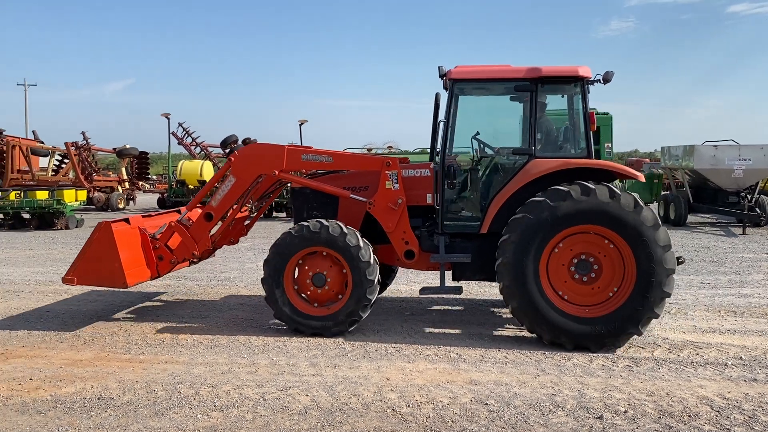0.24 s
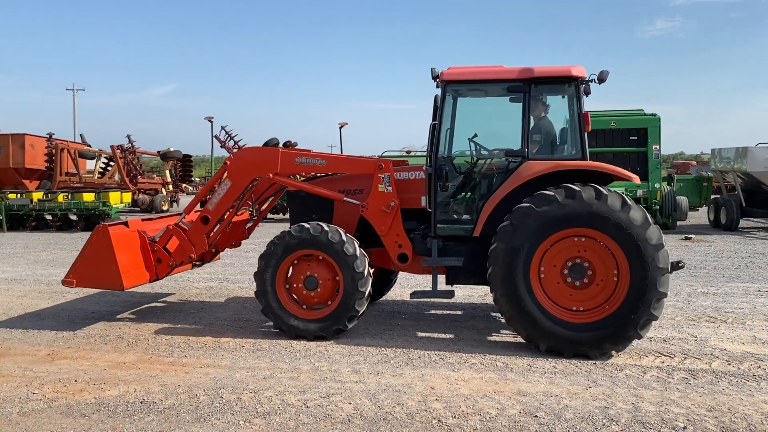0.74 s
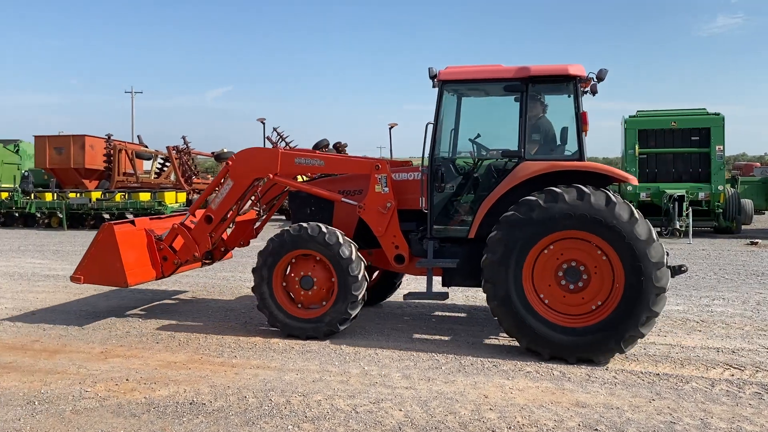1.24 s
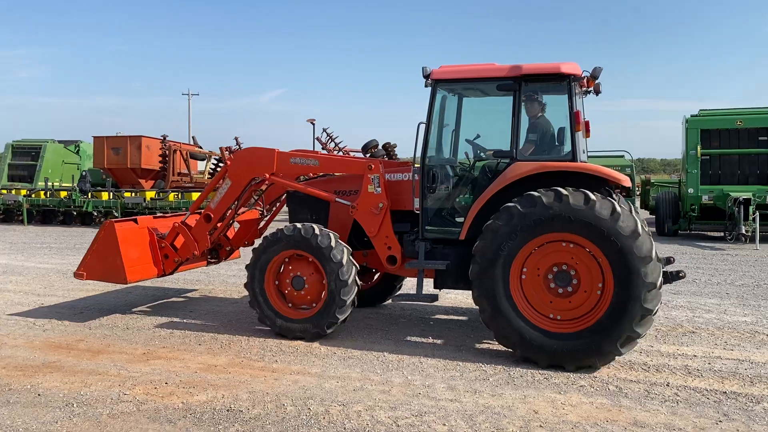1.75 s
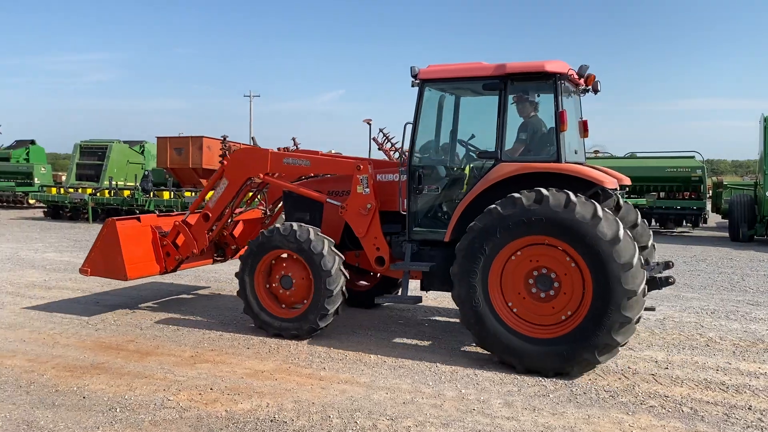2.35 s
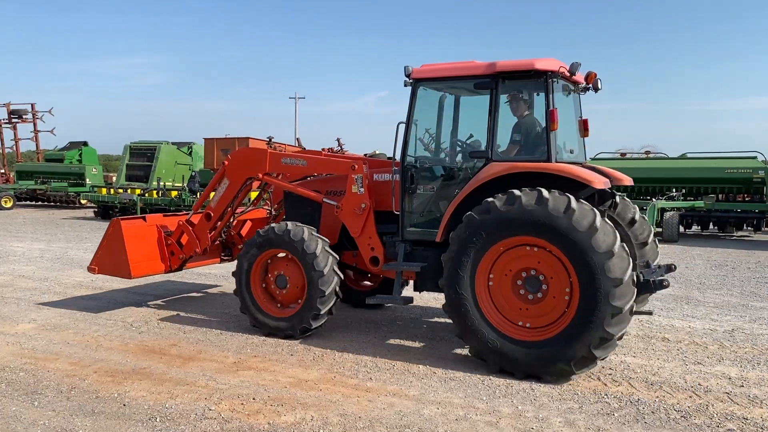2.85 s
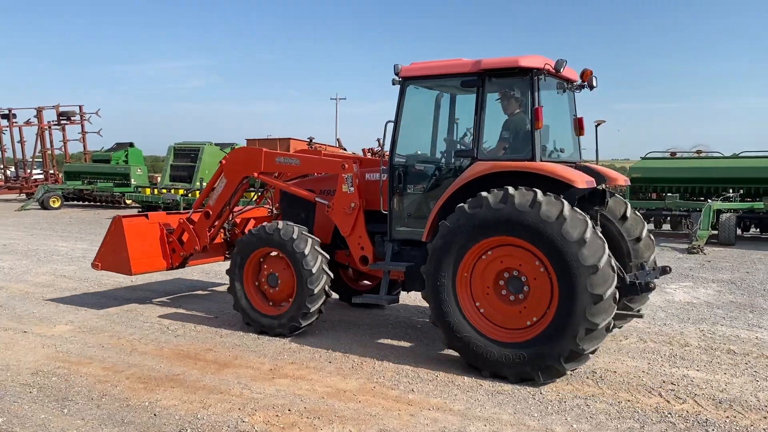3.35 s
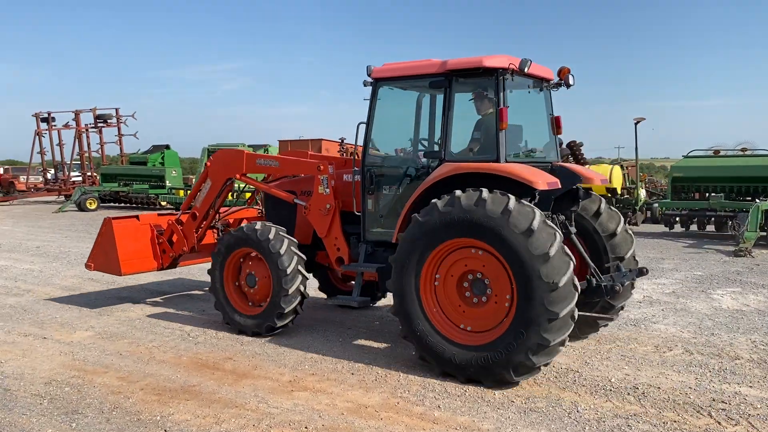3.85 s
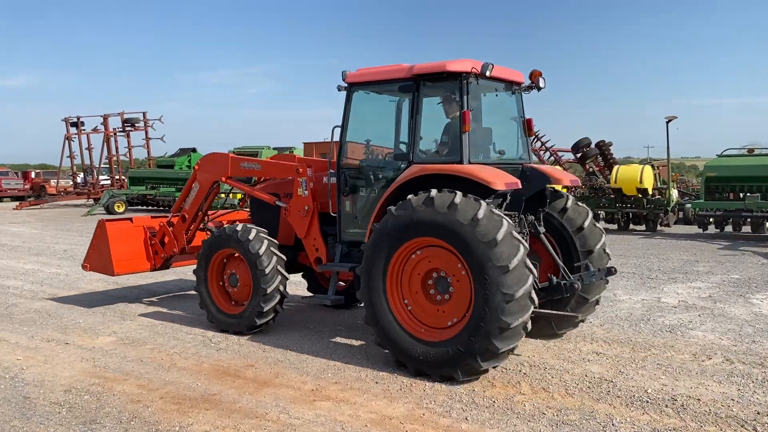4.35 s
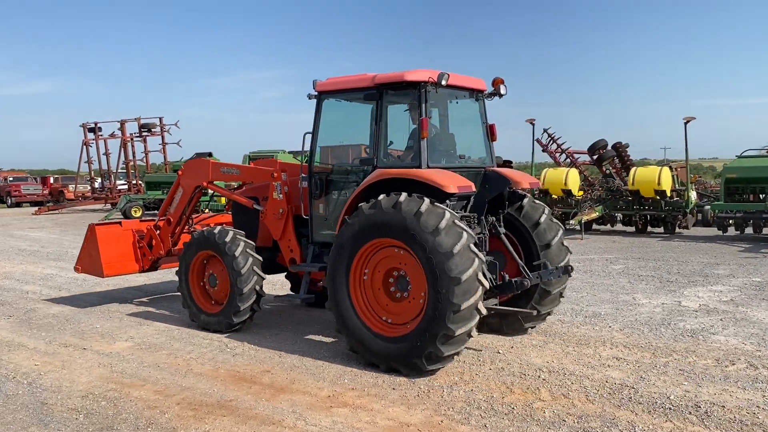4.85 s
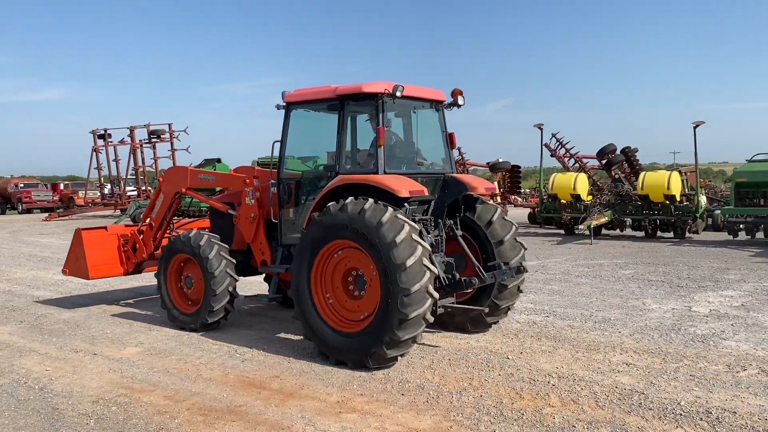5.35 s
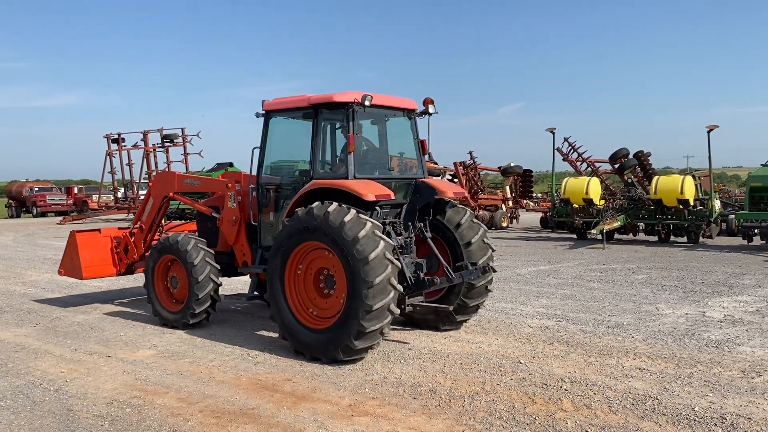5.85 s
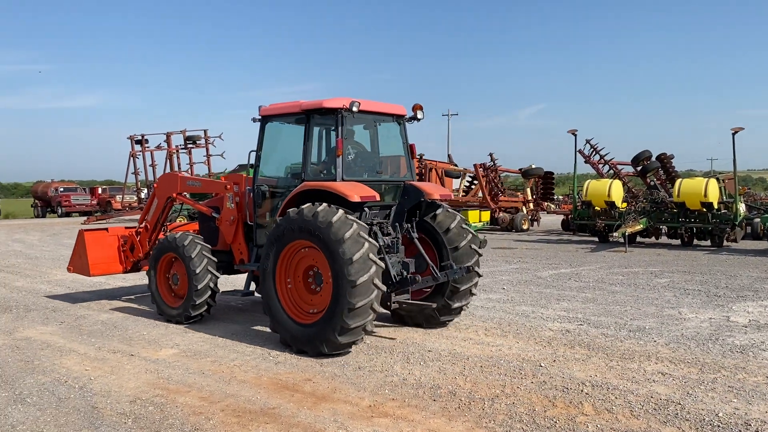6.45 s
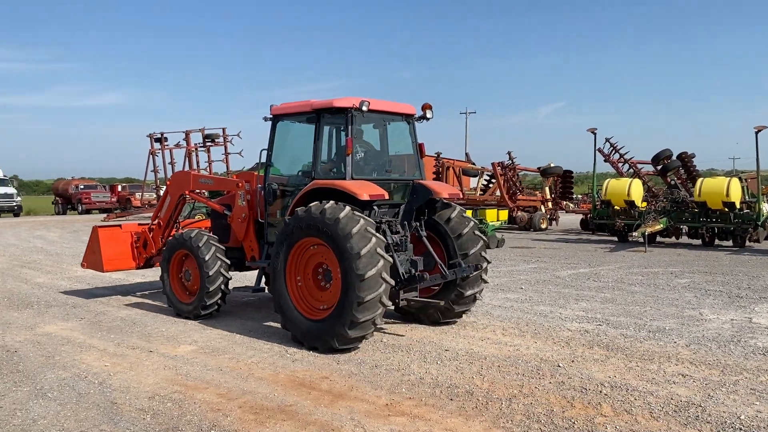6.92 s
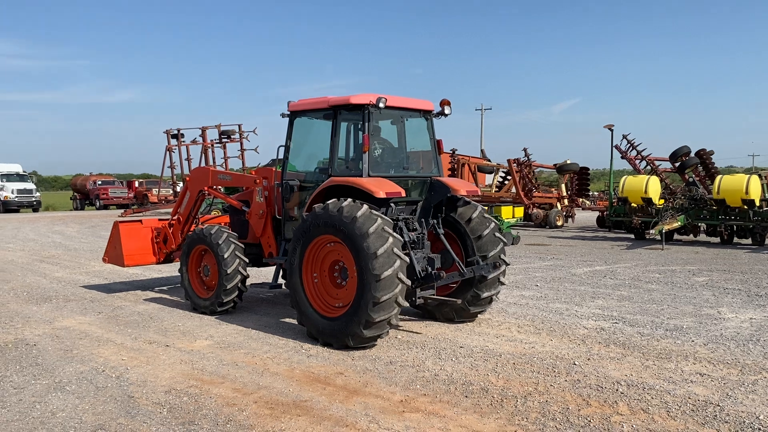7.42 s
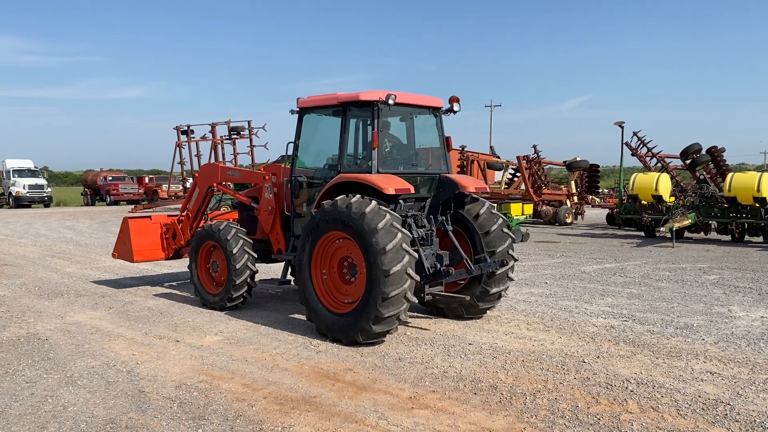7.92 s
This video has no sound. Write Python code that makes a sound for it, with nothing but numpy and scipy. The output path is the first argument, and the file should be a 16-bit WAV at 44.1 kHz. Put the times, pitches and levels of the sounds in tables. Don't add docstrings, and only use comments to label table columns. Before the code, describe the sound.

A diesel tractor creeps over a gravel yard at close to middle distance, its engine knocking and rattling steadily with low boom, hiss and a thin throbbing whine. Single stones snap under the tyres. Around five and a half seconds the revs sink to a slower, duller idle, then gravel crunches briefly. Wind rumbles and thumps on the bare stereo microphone throughout most of it, with strong late bursts.

```python
import sys
import numpy as np
from scipy import signal
from scipy.fft import rfft, irfft, next_fast_len
from scipy.io import wavfile

SR = 44100
rng = np.random.default_rng(int(sys.argv[2]) if len(sys.argv) > 2 else 0)


def gain_from_db(level_db):
    decades = np.asarray(level_db, float) / 20
    return 10 ** decades


def store_wav(level_fs):
    pcm = np.round(np.clip(np.atleast_2d(level_fs), -1, 1) * 32767)
    wavfile.write(sys.argv[1], SR, pcm.T.astype(np.int16))


N = 360738

# (time [s], level [dB], turned away [0-1])
TRACTOR = [(0, -28.5, 0.06), (.5, -28, 0.07), (1, -28, 0.08), (1.5, -28.5, 0.13), (2.4, -25.5, 0.04),
           (2.7, -27.5, 0.15), (3.05, -27.5, 0.03), (3.8, -29, .2), (4.1, -27.5, 0.1), (5.2, -29, 0.2),
           (5.5, -31, 0.68), (5.9, -31.5, 1), (6.15, -33, 0.26), (7, -32, 1), (7.3, -34.5, 0.54),
           (7.6, -34.5, 1), (8.18, -33.5, 1)]
# (time [s], peak [dB])
GRIT_TICKS = [(0.185, -40), (0.5127, -48), (1.1343, -48), (1.27, -37), (1.6452, -47), (1.8836, -46),
              (2.2194, -42), (2.2373, -36), (2.9294, -51), (3.2254, -47), (4.5895, -31), (4.8698, -35),
              (5.6501, -40), (5.7798, -39), (6.6134, -35), (6.8244, -40), (6.992, -43)]


def evened(x):
    return x / np.sqrt(np.mean(x ** 2) + 1e-20)


def read(points, hz):
    f, value = np.transpose(points)
    return np.interp(np.log(hz + 1), np.log(f + 1), value)


def curves(rows):
    s, *columns = np.transpose(rows)
    return [np.interp(np.arange(N) / SR, s, c) for c in columns]


def swells(rows):
    t = np.arange(N) / SR
    return sum(db * np.exp(-((t - s) / half) ** 4) for s, db, half in rows)


def drift(hz):
    return evened(signal.lfilter(*signal.butter(2, hz, fs=SR), rng.standard_normal(N)))


def coloured(x, points):
    size = next_fast_len(N)
    response = gain_from_db(read(points, np.fft.rfftfreq(size, 1 / SR)))
    return irfft(rfft(x, size) * response, size)[..., :N]


def resonate(x, hz, width):
    peak = signal.iirpeak(hz, hz / width, fs=SR)
    return signal.lfilter(*peak, signal.lfilter(*peak, x))


def snap(noise, lo_hz, hi_hz, decay):
    n = np.arange(len(noise))
    blow = (noise + 9 * (n == 0)) * np.exp(-n / SR / decay)
    band = signal.lfilter(*signal.butter(3, [lo_hz, hi_hz], "band", fs=SR), blow)
    return band / abs(band).max()


def at_ports(direct, diffuse):
    # (frequency [Hz], coherence [0-1])
    likeness = [(60, 0.84), (130, 0.88), (290, 0.54), (640, 0.69), (1410, 0.78), (3100, 0.51), (6820, 0.4),
                (15000, 0.17)]
    # (frequency [Hz], left over right [dB])
    balance = [(60, 0.00032), (180, -0.15), (550, 1.0), (1500, .3), (2800, -1.3), (5500, 0.92),
               (15000, -0.12)]
    # (frequency [Hz], left leads by [rad])
    lead = [(60, 0.36), (1500, 0.25), (3000, 0), (4900, 0.83), (5600, 1), (7000, 0)]
    size = next_fast_len(N)
    hz = np.fft.rfftfreq(size, 1 / SR)
    same = np.clip(read(likeness, hz), 0, 1)
    left = rfft(direct, size)
    right = same * left + np.sqrt(1 - same ** 2) * rfft(diffuse, size)
    right = right * np.exp(-1j * read(lead, hz))
    tilt = gain_from_db(read(balance, hz) / 2)
    return irfft(np.array([left * tilt, right / tilt]), size)[:, :N]


def far_hum():
    # (frequency [Hz], width [Hz], level [dB])
    far_line = (1150, 14, -53)
    hz, width, db = far_line
    return gain_from_db(db) * evened(resonate(rng.standard_normal(N), hz, width)) * np.array([[1], [-.6]])


def wind():
    # (time [s], rumble [dB], flutter [dB], unlike share [0-1])
    mean_wind = [(0, -16, -24, 0.35), (.9, -20, -26.5, 0.14), (1.2, -22.5, -26, 0.16),
                 (1.4, -15, -27.5, 0.28), (2.1, -15.5, -20.5, 0.52), (2.9, -14, -24, 0.18),
                 (3.15, -20, -24.5, 0.14), (4.0, -22, -22, 0.1), (4.45, -32.5, -23, 0.02),
                 (4.6, -19, -24, 0.2), (5.25, -19, -20.5, 0.14), (5.85, -22.5, -25.5, 0.29),
                 (6.5, -24, -22.5, .25), (6.9, -19, -18, 0.27), (7.0, -21, -29, 0.6),
                 (7.5, -23.5, -27, 0.48), (7.56, -33.5, -37, 0.4), (8.18, -38, -39, 0.36)]
    # (middle [s], rumble swell [dB], half length [s], flutter swell [dB])
    gusts = [(0.106, 1, 0.066, 5.5), (0.266, -16, 0.029, 1), (0.221, 4.5, 0.032, -19),
             (.55, -13, 0.034, -3), (1.273, 3.5, 0.029, 2.5), (1.496, 5, 0.015, 4), (7.3, -3, 0.079, -0.5),
             (1.672, -18, 0.029, 0), (7.168, 2, 0.015, -6), (2.26, 0, 0.052, 5), (2.38, 9.5, 0.033, 4.5),
             (2.48, -7, 0.068, 0), (2.938, 2.5, 0.028, 7.5), (3.03, 2.5, 0.042, 1.5), (3.74, -4, 0.036, -6),
             (4.784, -7, 0.028, -0.5), (4.927, 1.5, 0.027, 1), (4.964, -3, 0.022, -10),
             (5.062, -3, 0.024, 0.5), (5.185, -9, 0.026, -4), (5.705, -3.5, 0.043, 3),
             (6.283, -9, 0.023, -1.5), (6.35, 2, 0.052, 3.5), (6.71, 1.5, 0.071, 4), (6.88, -7, 0.028, -2),
             (7.103, 6.5, 0.063, 14.5), (7.214, 6, 0.021, 12.5), (7.399, 10.5, 0.033, 11),
             (7.469, -1, 0.029, 11), (7.777, 15, 0.011, -8), (8.17, 0, 0.066, 11)]
    # (frequency [Hz], density [dB per Hz])
    rumble_spectrum = [(20, -49), (35, -4.5), (55, 6.5), (90, 5), (140, -4.5), (220, -18), (400, -71)]
    # (frequency [Hz], density [dB per Hz])
    flutter_spectrum = [(70, -21), (130, 1), (200, 0), (300, -6.5), (450, -8.5), (700, -25.5), (1100, -79)]
    rumble_db, flutter_db, unlike = curves(mean_wind)
    rumble_db = rumble_db + swells([(s, db, half) for s, db, half, _ in gusts])
    flutter_db = flutter_db + swells([(s, db, half) for s, _, half, db in gusts]) - rumble_db
    lumps_db = drift(11.5)
    noise = rng.standard_normal((2, 2, N))
    rumble = evened(coloured(noise[0], rumble_spectrum) * gain_from_db(1.15 * lumps_db))
    flutter_lumps = gain_from_db(1.2 * lumps_db + 1.8 * drift(40))
    flutter = gain_from_db(flutter_db - 2.5) * evened(coloured(noise[1], flutter_spectrum) * flutter_lumps)
    apart = np.clip(unlike, 0, 1) * (0.68 * rumble[1] + 1.44 * flutter[1])
    level = gain_from_db(rumble_db - 0.5 + np.array([[.2], [-.2]]))
    return level * (rumble[0] + flutter[0] + apart * np.array([[1], [-1]]))


def pops():
    # (time [s], peak [dB], length [s])
    soft_pops = [(.07, -6.5, 0.015), (0.108, -16, 0.015), (1.483, -13, 0.023), (1.808, -15, 0.015),
                 (2.367, -11.5, 0.034), (2.393, -11.5, 0.026), (6.719, -6.5, 0.018), (6.962, -15, 0.031),
                 (7.041, -5.5, 0.025), (7.093, -8.5, 0.021), (7.118, -2.5, 0.024), (7.191, -11, 0.015),
                 (7.406, -19, 0.033), (7.447, -17, 0.024)]
    # (time [s], peak [dB], length [s])
    sharp_pops = [
        (5.228, -16, 0.023),
        (6.594, -22, 0.019),
        (6.849, -9, 0.0076),
        (7.07, -10.5, 0.0113),
        (7.125, -9, 0.0188),
        (7.211, -0.5, 0.014),
        (7.384, -16, 0.021),
    ]
    # (time [s], peak [dB], length [s])
    thumps = [
        (0.078, 3.5, 0.013),
        (.134, -1, 0.018),
        (1.494, -10, .02),
        (1.553, -7, 0.013),
        (1.705, -7, 0.014),
        (1.82, -7, 0.022),
        (2.94, -8.5, 0.044),
        (.32, -12, 0.026),
        (7.344, -12, .03),
    ]
    out = np.zeros(N + SR)
    for extra_hz, rows in (226.5, soft_pops), (626, sharp_pops), (70, thumps):
        for s, db, length in rows:
            t = np.arange(round(3 * length * SR)) / SR
            pitch = 75 + extra_hz * np.exp(-t / (0.311 * length))
            swing = np.sin(2 * np.pi * np.cumsum(pitch) / SR)
            envelope = np.exp(-t / length) * np.minimum(t / 0.0019, 1) * np.cos(np.pi / 6 * t / length)
            out[round(s * SR):][:len(t)] += gain_from_db(db) * swing * envelope
    return out[:N]


def stones():
    # (time [s], crack
    # peak [dB], knock above crack [dB])
    cracks = [(.0245, -33, 17.5), (.1335, -33, 15), (.218, -29, 0), (.2425, -31, 14.5), (.3515, -32, 13.5),
              (.5135, -26, 0), (.637, -30, 0), (1.3074, -28, 0), (1.708, -27, -3), (1.917, -28, 3),
              (2.0445, -34, 14), (2.3635, -28, 0), (2.4593, -25, 0), (2.523, -26, -3), (2.585, -27, 0),
              (2.637, -26, -2), (2.674, -29, -2), (2.9305, -27, 0), (3.0245, -28, 0), (3.2268, -17, -6),
              (3.5403, -28, -2), (3.9915, -31, 17), (4.0515, -32, 15), (4.2, -27, 0), (4.6114, -28, 0),
              (4.7725, -22, -4), (5.2288, -35, 17), (5.324, -29, 0), (5.3966, -28, -4), (5.6503, -18, -1),
              (5.678, -37, 8), (5.705, -27, 7), (5.727, -27, 4), (6.4845, -28, 0), (6.529, -32, 0),
              (6.5575, -31, 6), (6.5929, -32, 5), (6.6024, -30, 13), (6.6932, -30, 9), (6.7035, -27, -2),
              (6.732, -28, 0), (6.8255, -32, 10), (6.849, -31, 10), (6.992, -30, -5)]
    # (time [s], peak [dB], ring [Hz])
    tings = [(.514, -30, 5500), (.637, -24, 1970), (1.0286, -34, 11500), (1.309, -23, 1470),
             (1.7095, -20, 1600), (1.917, -17, 900), (2.0445, -21, 1900), (2.363, -23, 1540),
             (2.5235, -24, 4500), (2.5825, -17, 1500), (2.638, -15, 1800), (2.674, -20, 2100),
             (2.928, -24, 1700), (2.929, -27, 3500), (3.2268, -24, 5000), (3.2268, -21, 3200),
             (4.0347, -32, 11500), (4.2, -18, 1470), (4.4268, -32, 12000), (4.613, -19, 1500),
             (4.773, -20, 2100), (4.773, -28, 3600), (5.3233, -34, 11000), (5.3255, -32, 5200),
             (5.6515, -18, 1500), (5.7055, -22, 850), (6.486, -32, 5500), (6.558, -22, 1500),
             (6.594, -21, 2400), (6.611, -9, 300), (6.62, -28, 4100), (6.626, -8, 290), (6.641, -10, 290),
             (6.694, -20, 1400), (6.7045, -25, 3800), (6.744, -27, 3300), (6.768, -24, 2400),
             (6.822, -24, 2400), (6.8255, -29, 4900), (6.857, -26, 1700), (6.993, -33, 5800),
             (6.598, -13, 750), (6.705, -36, 11000), (7.3845, -20, 700)]
    decay_s, ting_ratio = .002, 1.25
    length = 800
    out = np.zeros((2, N + SR))
    for (s, db, knock_db), noise in zip(cracks, rng.standard_normal((len(cracks), length))):
        crack = snap(noise, 1100, 4300, decay_s)
        knock = gain_from_db(knock_db) * snap(noise, 600, 1050, 2 * decay_s)
        out[:, round(s * SR):][:, :length] += gain_from_db(db + 3.5) * (crack + knock)
    for (s, db, hz), noise in zip(tings, rng.standard_normal((len(tings), length))):
        ring = snap(noise, hz / ting_ratio, hz * ting_ratio, decay_s)
        out[:, round(s * SR):][:, :length] += gain_from_db(db) * ring
    for (s, db), noise in zip(GRIT_TICKS, rng.standard_normal((len(GRIT_TICKS), length))):
        out[:, round(s * SR):][:, :length] += gain_from_db(db + 12) * snap(noise, 8100, 15000, .0012)
    return out[:, :N]


def crunch():
    # (time [s], grind [dB], low thud above grind [dB])
    gravel = [
        (6.44, -29, -10),
        (6.58, -28, -3),
        (6.6, -19.5, 5.5),
        (6.66, -25, 8),
        (6.76, -28.5, -1),
        (6.81, -30, 12),
        (6.855, -29, 1),
        (6.9, -36.5, 10.5),
        (7.2, -41.5, 8),
    ]
    # (frequency [Hz], density [dB per Hz])
    grind_spectrum = [(290, -7), (500, 1.5), (996, 0.5), (1210, -8), (1500, -5), (2920, -17.5), (3860, -23),
                      (6980, -29), (9000, -52), (11700, -86), (19800, -120)]
    # (middle [s], swell [dB], half length [s])
    fizz_swells = [
        (6.635, 24, .05),
        (6.745, 21, .05),
        (6.835, 21, .035),
        (6.925, 14, .02),
    ]
    # (frequency [Hz], width [Hz], level [dB])
    fizz_rings = [(1700, 940, 1.5), (2450, 560, -2), (3680, 1300, -4.5), (4670, 760, -12)]
    grind_db, thud_db = curves(gravel)
    t = np.arange(N) / SR
    past_s = 6.95
    unlike = np.interp(t, [past_s - .03, past_s + .03], [0.53, 2.2])
    fade_in = np.clip((t - gravel[0][0]) / 0.11, 0, 1)
    fade_out = np.clip((gravel[-1][0] - t) / 0.051, 0, 1)
    struck = rng.random((2, N)) < 6000 / SR
    grain_size = gain_from_db(1.1 * np.minimum(rng.exponential(1, (2, N)), 4))
    grains = grain_size * struck * rng.standard_normal((2, N))
    thud = evened(resonate(grains[0], 293, 55)) + .5 * evened(resonate(grains[0], 433, 116))
    fizz = 0
    for hz, width, db in fizz_rings:
        ring = evened(resonate(np.roll(grains[0], round(hz)), hz, width))
        fizz = fizz + gain_from_db(db + 2.5 * drift(60)) * ring
    fizz = gain_from_db(-55.5 + swells(fizz_swells)) * evened(fizz)
    grind = evened(coloured(grains, grind_spectrum))
    grind = grind[0] + unlike * grind[1] * np.array([[1], [-1]])
    return fade_in * fade_out * gain_from_db(grind_db) * (grind + gain_from_db(thud_db - 4.5) * thud) + fizz


def injectors(turns):
    level_db, away = curves(TRACTOR)
    firing, phase = np.divmod(turns + .15 + .05 * drift(15), 1)
    size_db = 6 * np.minimum(rng.exponential(1, 400), 3)[firing.astype(int)]
    ticks = rng.standard_normal(N) * np.exp(-phase / .04) * gain_from_db(size_db)
    bright = signal.lfilter(*signal.butter(2, [7500, 16000], "band", fs=SR), ticks)
    return gain_from_db(level_db - 30.5 - 3.3 * away) * evened(bright)


def panels(turns):
    # (multiple of the firing rate, level re tractor [dB], middle [s], half length [s])
    lifted = [(20, -12, .45, .5), (25, -15, .5, .6), (15.5, -17, .4, .5), (37, -20, .6, .6),
              (15, -15, 3.7, 1.4), (18, -16, 3.7, 1.4), (22, -15, 3.7, 1.5), (37, -16, 3.6, 1.6),
              (29, -14, 7.6, .7), (29, -13, 7.4, .14), (5, -1, 4.05, .15)]
    t = np.arange(N) / SR
    lines = 0
    for order, db, s, half in lifted:
        level = gain_from_db(db + 2.5 * drift(6)) * np.exp(-((t - s) / half) ** 4)
        lines = lines + level * np.sin(2 * np.pi * (order * turns + rng.random()) + .4 * drift(8))
    return np.sqrt(2) * gain_from_db(curves(TRACTOR)[0]) * lines


def pump(turns):
    # (middle [s], swell [dB], half length [s])
    load = [(.75, 10, .18), (1.3, 4, .3), (2.0, 2, .4), (2.72, 9, .12), (3.3, 10, .15), (4.3, 3, .2),
            (4.79, 12, .1), (4.99, 12, .09), (5.14, 10, .05), (5.23, 3, .04), (5.36, -8, .08),
            (5.47, 13, .022), (5.555, 12, .062), (5.68, 2, .04), (5.76, 10, .03), (5.82, 5, .03),
            (5.9, 9, .055), (6.2, 7, .12), (7.05, 3, .1), (7.45, 8, .13), (7.75, 6, .17), (8.1, -3, .1)]
    whine_db = curves(TRACTOR)[0] - 18.5 + swells(load) + 1.5 * drift(12)
    throb = 1 + .3 * np.cos(2 * np.pi * turns) + .25 * np.cos(np.pi * turns / 2)
    return np.sqrt(2) * gain_from_db(whine_db) * throb * np.sin(2 * np.pi * 54 * turns + 0.52 * drift(29))


def exhaust(turns):
    # (middle [s], swell [dB], half length [s])
    boom = [(0, 4, 0.43), (.85, 10, 0.27), (1.8, 8, 0.11), (2.5, -1, 0.27), (2.98, 7.5, .1),
            (3.4, 8.5, 0.34), (4.13, 10, 0.42), (5.3, 6, 0.29), (6.1, -10, 0.12), (6.7, -3, 0.18),
            (7.2, 14.5, 0.29), (7.9, -18, 0.14)]
    # (multiple of the firing rate, level re 5th order [dB])
    weaker_orders = [(1, -2), (3, -1), (4, -1), (6, -9), (9, -6), (15, -9), (18, -13), (20, -13), (24, -15),
                     (37, -17)]
    # (frequency [Hz], width [Hz], level re tractor [dB])
    rear_panel = (850, 8.7, -11.5)
    level_db, away = curves(TRACTOR)
    away_db, away_fourth_db = -12.5 * away, 4.5 * away
    second_db = level_db - 2 + swells(boom)
    fifth_db = level_db - 5.5 + drift(2.5)
    out = gain_from_db(second_db) * np.sin(2 * np.pi * 2 * turns)
    out += gain_from_db(fifth_db + away_db) * np.sin(2 * np.pi * 5 * turns)
    for order, db in weaker_orders:
        turn_db = away_fourth_db if order == 4 else away_db
        order_db = fifth_db + db + turn_db + 2.5 * drift(4)
        out += gain_from_db(order_db) * np.sin(2 * np.pi * (order * turns + rng.random()))
    hz, width, db = rear_panel
    hum = evened(resonate(rng.standard_normal(N), hz, width))
    return np.sqrt(2) * out + away * gain_from_db(level_db + db) * hum


def block(turns):
    # (frequency [Hz], density [dB per Hz])
    side_on = [(150, -34), (250, -1.5), (500, -3.5), (830, 0), (1000, -1.5), (1220, -10), (1450, -3.5),
               (1760, -14), (2090, -11), (2900, -17.5), (4900, -22), (5300, -29), (8000, -31.5),
               (15800, -36)]
    # (frequency [Hz], density [dB per Hz])
    rear_on = [(35, -36), (60, -4), (128, 2.5), (240, -7), (780, -7), (930, -5.5), (1150, -11),
               (1780, -13.5), (2300, -13), (2900, -18.5), (4900, -25.5), (5300, -26.5), (8000, -33.5),
               (15800, -39.5)]
    # (frequency [Hz], width [Hz], level [dB])
    panel_rings = [(769, 244, 4), (894, 113, 2.5), (1457, 190, 1.5), (2130, 350, -5.5), (2570, 1040, -8),
                   (3420, 1400, -6.5), (4550, 860, -11.5), (12000, 17000, -9)]
    panel_lag = [.2, .15, .1, .22, .06, .2, .12, 0]
    cylinders_db = [4.4, 4.9, 0.83, 3.6]
    level_db, away = curves(TRACTOR)
    away = np.clip(away, 0, 1)
    firing, phase = np.divmod(turns + .15, 1)
    firing = firing.astype(int)
    combustion = np.exp(-phase / 0.25)
    valves = 0.26 * np.exp(-((phase + .45) % 1) / 0.06)
    burst = combustion + valves
    hiss = rng.standard_normal((2, N)) * (1 + 0.16 * burst) * gain_from_db(drift(5))
    side_hiss, rear_hiss = evened(coloured(hiss, side_on)), evened(coloured(hiss, rear_on))
    hiss = np.sqrt(1 - away) * side_hiss + np.sqrt(away) * rear_hiss
    knock = 0
    for k, (hz, width, db) in enumerate(panel_rings):
        scatter_db = 2.2 * np.clip(rng.standard_normal(400), -2, 1.2)[firing]
        cylinder_db = np.roll(cylinders_db, k // 2 * 2)[firing % len(cylinders_db)]
        blows = np.roll(burst * gain_from_db(scatter_db + cylinder_db), round(panel_lag[k] * SR / 38))
        ring = evened(resonate(rng.standard_normal((2, N)) * blows, hz, width))
        knock = knock + gain_from_db(db + 1.5 * drift(1.5)) * ring
    return gain_from_db(level_db) * (hiss + gain_from_db(-3 - 9 * away) * evened(knock))


def scene():
    # (time [s], firing rate [firings per s])
    speed = [(0, 36.7), (.6, 36.5), (1.0, 37.5), (1.3, 37.1), (1.8, 38.1), (2.4, 39.1), (3.7, 39.15),
             (5.1, 39.0), (5.3, 38.5), (5.47, 37.6), (5.6, 35.5), (5.9, 31.5), (5.98, 30.8), (6.3, 31.7),
             (6.6, 31.9), (7.3, 32.35), (8.18, 32.45)]
    turns = np.cumsum(curves(speed)[0] - .095) / SR
    direct, diffuse = block(turns)
    whine = pump(turns)
    echo = .4 * np.roll(whine, 300)
    tractor = at_ports(direct + whine + exhaust(turns), diffuse + echo)
    tractor = tractor + panels(turns) + injectors(turns)
    return far_hum() + wind() + pops() + stones() + crunch() + tractor


def top_cut(x):
    return signal.sosfilt(signal.butter(12, 17020, fs=SR, output="sos"), x)


def kept(share):
    return np.sign(share) * np.clip((abs(share) - .42) / 0.3, 0, 1) ** .5 * 0.47


def record(dry):
    split_hz, half_turn_hz = 7050, 2040
    size = next_fast_len(N)
    hz = np.fft.rfftfreq(size, 1 / SR)
    left, right = rfft(1.058 * np.tanh(dry / 1.14), size) * np.clip((15850 - hz) / 60, 0, 1)
    half = np.pi / 2 * np.maximum(hz - split_hz, 0) / half_turn_hz
    treble = np.clip((hz - 6200) / 1600, 0, 1)
    sum_share, difference_share = kept(np.cos(half)), kept(np.sin(half))
    mid = np.where(hz > split_hz + 700, left * sum_share, (left + right) / 2)
    treble_side = 1j * left * np.where(hz < 8300, np.sin(half), difference_share)
    side = (1 - treble) * (left - right) / 2 - treble * treble_side
    holes = left * (hz > 8000) * np.array([sum_share == 0, difference_share == 0])
    ticks = np.zeros(size)
    ticks[[round((row[0] + .009) * SR) for row in GRIT_TICKS]] = 1
    refill = .75 * np.convolve(ticks, np.hanning(1100), "same") * irfft(holes, size)
    mid, side = irfft(np.array([mid, side]), size) + refill
    return top_cut(np.array([mid + side, mid - side])[:, :N])


dry = scene()
out = record(dry)
store_wav(out)
```